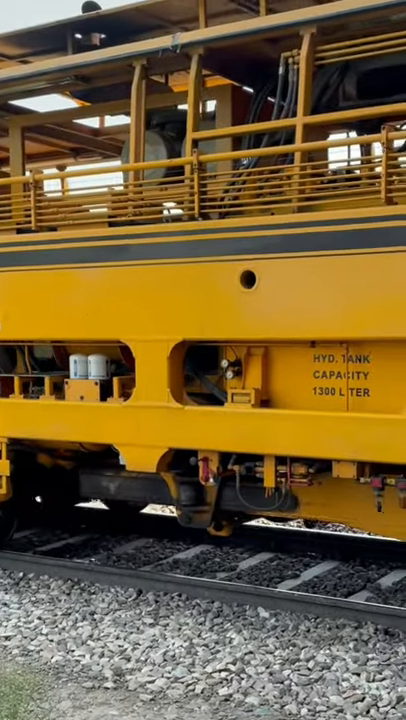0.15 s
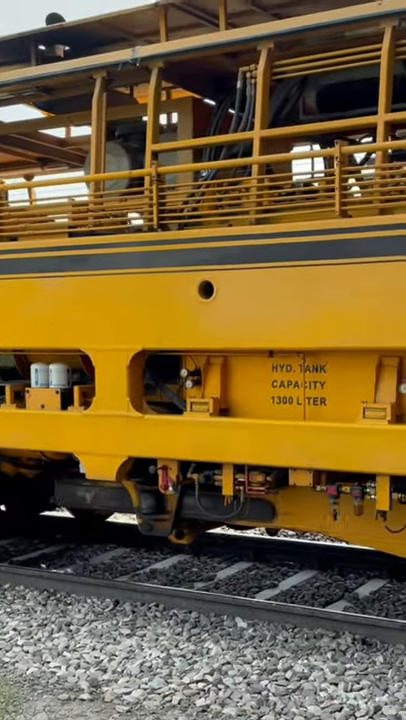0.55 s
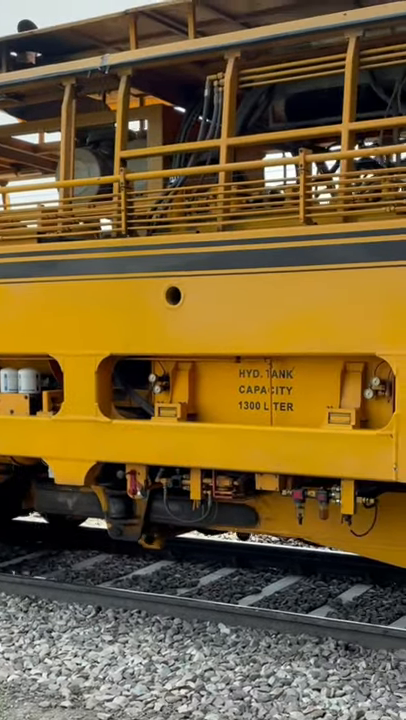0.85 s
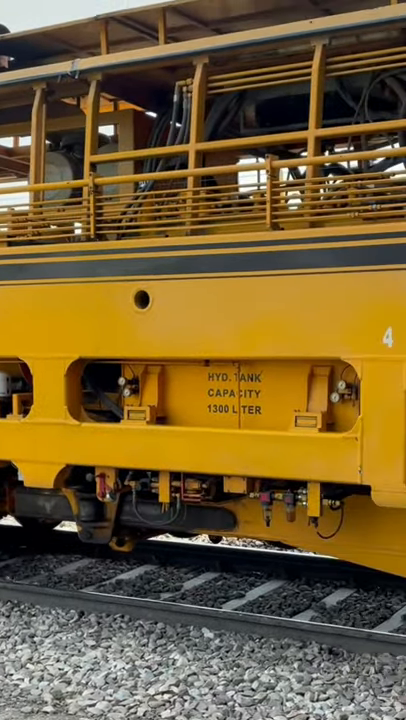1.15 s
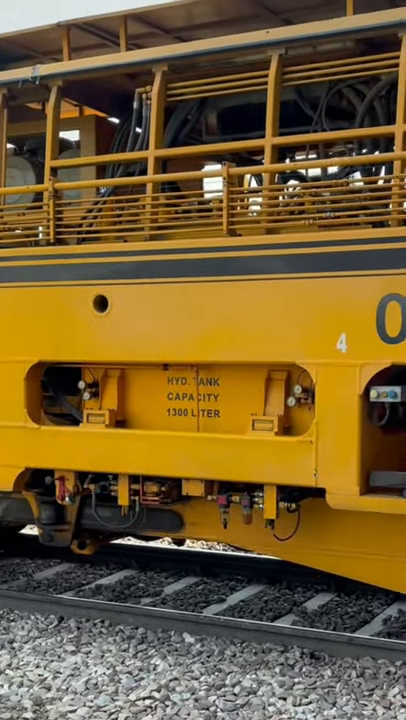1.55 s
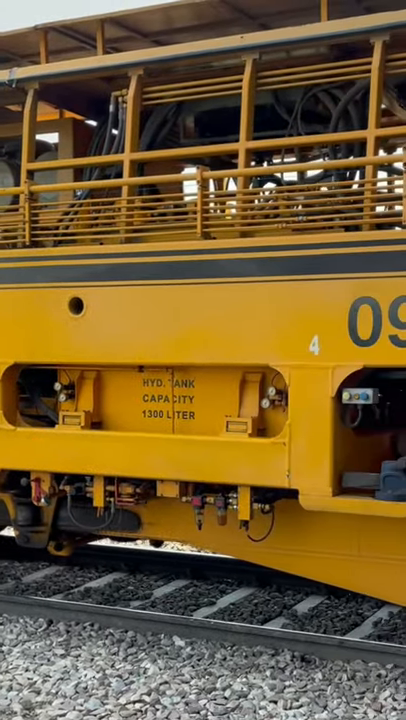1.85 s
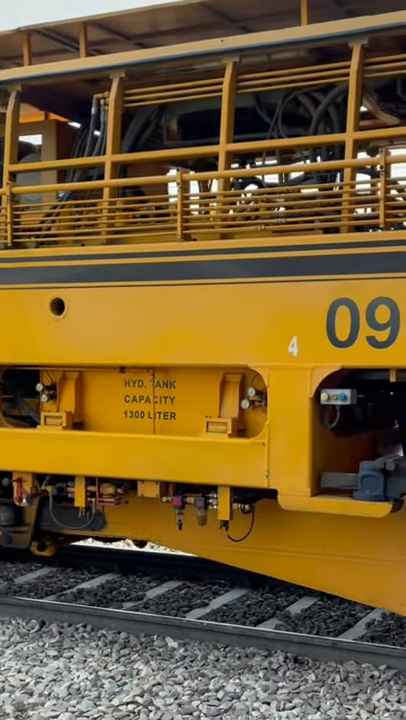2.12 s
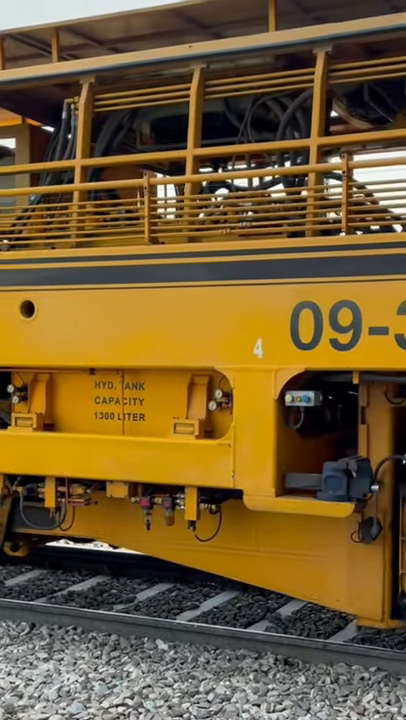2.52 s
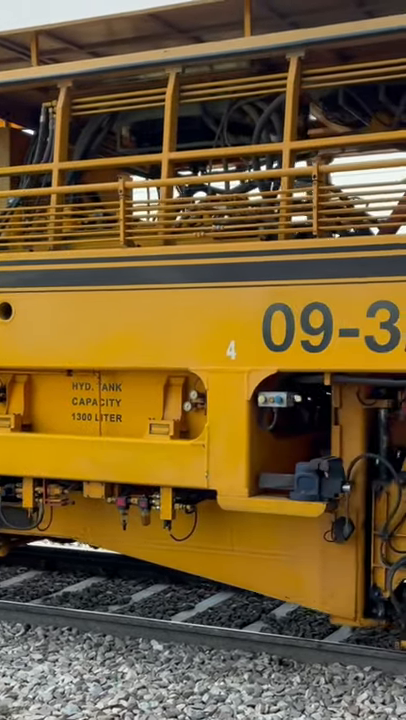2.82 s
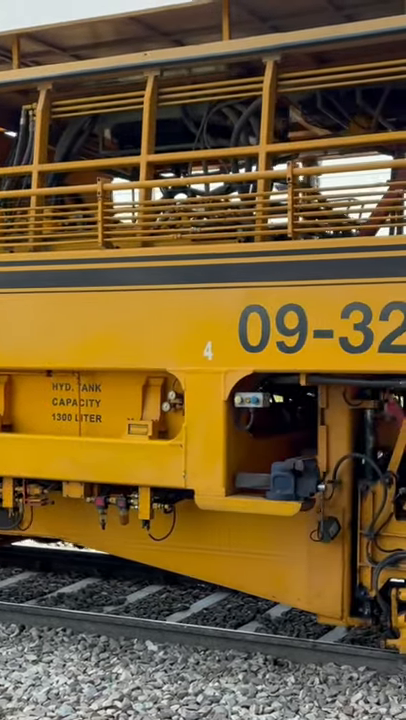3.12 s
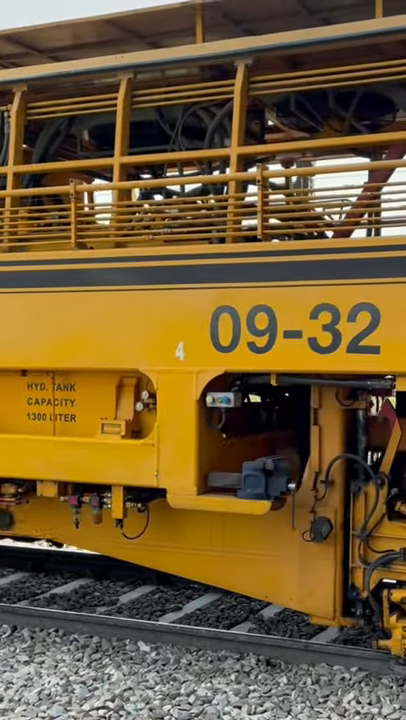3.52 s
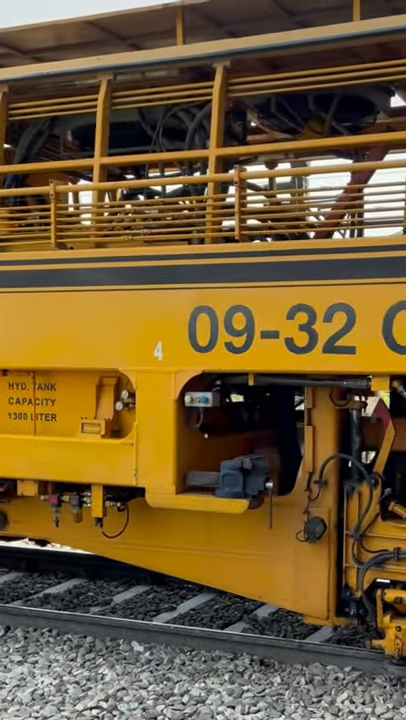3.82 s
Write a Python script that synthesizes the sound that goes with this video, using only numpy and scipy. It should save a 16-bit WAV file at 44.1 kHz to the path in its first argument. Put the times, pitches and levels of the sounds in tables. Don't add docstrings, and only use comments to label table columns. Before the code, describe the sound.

Continuous heavy diesel drone and machinery roar from a slow rail vehicle on ballast; the low drone swells early then eases, with thin whistle, air hiss and one tiny tick midway, close stereo microphone outdoors.

```python
import sys
import numpy as np
from scipy import signal
from scipy.fft import rfft, irfft
from scipy.io import wavfile

SR = 44100
rng = np.random.default_rng(int(sys.argv[2]) if len(sys.argv) > 2 else 0)


def ratio(d):
    e = np.asarray(d, float) / 20
    return 10 ** e


def inscribe(sig):
    pcm = np.round(np.clip(np.atleast_2d(sig).T, -1, 1) * 32767)
    wavfile.write(sys.argv[1], SR, pcm.astype(np.int16))


N = 175077
T_S, FREQ_HZ = np.arange(N) / SR, np.fft.rfftfreq(N, 1 / SR)

# pitch_hz, density_db_per_hz, port_likeness_0_to_1, left_lead_rad, left_minus_right_db
EXHAUST_SPECTRUM = [(30.0, -74.0, 1.0, -0.0, -0.0), (60.0, -55.8, 1.0, 0.0, -0.0),
                    (95.0, -53.9, 0.99, -0.0, 0.3), (145.0, -53.1, 0.99, -0.03, 0.5),
                    (200.0, -46.3, 1.0, -0.08, 1.2), (300.0, -45.4, 0.99, -0.14, 1.3),
                    (420.0, -46.3, 0.98, -0.34, 1.6), (520.0, -50.6, 0.9, -0.39, -0.4)]
CASING_SPECTRUM = [(520, -50.8, .9, -.39, -.4), (750, -52.3, .96, -.06, .4), (1150, -55.4, .95, -.03, -2.2),
                   (1500, -56.6, 1, 0, 0), (2030, -58.3, 1, 0, 0), (2450, -58.6, .83, .44, -2.7),
                   (2800, -61.5, .78, .65, -2.1), (3400, -66, .52, .59, -1.1)]
FAN_SPECTRUM = [(3400, -66, .52, .59, -1.1), (3800, -65.3, .6, .2, 2.2), (4200, -69.3, .72, .55, .1),
                (4650, -69.5, .45, .8, -.5), (4920, -72.5, 0, .3, -1), (5400, -69.3, .86, .2, 0),
                (6500, -71, .82, .94, 0), (8000, -72.3, .82, 2.1, 0)]
HISS_SPECTRUM = [(8000, -72.6, .82, 2.1, 0), (8750, -72.6, .88, 2.75, 0), (9430, -69, 1, np.pi, 0),
                 (11300, -76.8, 1, np.pi, 0), (11950, -78.4, .7, 3.85, 0), (13600, -81.3, .7, 5.5, 0),
                 (14000, -82.3, 1, 2 * np.pi, 0), (15720, -92.5, 1, 2 * np.pi, 0)]


def in_time(rows):
    row_s, *columns = np.transpose(rows)
    return [np.interp(T_S, row_s, column) for column in columns]


def in_pitch(rows):
    row_hz, *columns = np.transpose(rows)
    return [np.interp(np.log(FREQ_HZ + 1), np.log(row_hz), column) for column in columns]


def drift(rate_hz):
    pole = np.exp(-80 * np.pi * rate_hz / SR)
    noise = rng.standard_normal(N // 40 + 2002)
    slow = signal.lfilter([1], [1, -2 * pole, pole ** 2], noise)[2000:]
    return np.interp(np.arange(N) / 40, np.arange(len(slow)), slow / slow.std())


def ports(rows):
    _, _, lead_rad, pan_db = in_pitch(rows)
    return np.exp([[.5j], [-.5j]] * lead_rad) * ratio([[.5], [-.5]] * pan_db)


def tones(base_hz, orders, rows, wander_rad):
    turn_rad = 2 * np.pi * np.cumsum(base_hz + 0 * T_S) / SR
    total = 0
    for order, (start_db, end_db, wobble_db) in zip(orders, rows):
        level_db = start_db + (end_db - start_db) * T_S / T_S[-1] + wobble_db * drift(3.56)
        phase_rad = order * turn_rad + wander_rad * order * drift(2.6) + rng.uniform(0, 2 * np.pi)
        total = total + np.sqrt(2) * ratio(level_db) * np.sin(phase_rad)
    return total


def roar(rows, patchy_db, rate_hz, count):
    density_db, alike, *_ = in_pitch(rows)
    alike = np.clip(alike, 0, 1)
    white = rfft(rng.standard_normal((3, N)))
    mixed = np.sqrt(alike) * white[0] + np.sqrt(1 - alike) * white[1:]
    pair = ratio(density_db) * np.sqrt(SR / 2) * ports(rows) * mixed
    centres_hz = np.geomspace(rows[0][0], rows[-1][0], count)
    inside = (FREQ_HZ >= centres_hz[0]) & (FREQ_HZ < centres_hz[-1])
    together = drift(rate_hz / 4)
    total = 0
    for one in np.eye(count):
        band = irfft(pair * inside * np.interp(FREQ_HZ, centres_hz, one), N)
        total = total + band * ratio(patchy_db * (0.36 * together + drift(rate_hz)))
    return total


def engine():
    # start_s, pitch_hz
    firing = [(0, 109.1), (1, 109.3), (1.9, 109.65), (2.5, 109.7), (3.2, 109.4), (3.97, 109.0)]
    engine_orders = [1, 5 / 3, 2, 8 / 3, 3, 13 / 3]
    # start_db, end_db, wobble_db
    engine_levels = [(-26, -22.6, .6), (-37, -37, 1.5), (-28, -28, 1.8), (-39, -39, 1.5), (-36, -31, 1.5),
                     (-38, -38, 1.5)]
    return tones(in_time(firing)[0], engine_orders, engine_levels, wander_rad=.15)


def exhaust_drone():
    # start_s, level_db
    drone_levels = [(0, -26.5), (.3, -22.3), (.65, -20), (1, -21.5), (1.8, -21.5), (2.2, -25), (2.65, -26),
                    (2.9, -29), (3.97, -28.5)]
    return ratio(in_time(drone_levels)[0]) * tones(363.95, [1], [(0, 0, 1)], wander_rad=.3)


def second_shaft():
    shaft_orders = [.75, 1, 2, 10 / 3, 4, 6, 8, 10]
    # start_db, end_db, wobble_db
    shaft_levels = [(-45, -45, 2.1), (-30, -34, .7), (-33, -33.5, 1.2), (-29, -36, 2), (-36, -27.5, 2),
                    (-42, -42, 2), (-42, -42, 2), (-44, -44, 2)]
    return tones(83.35, shaft_orders, shaft_levels, wander_rad=.22)


PUMP_SPEED_HZ = 91.75


def pump():
    pump_orders = [3, 3.308, 6, 10]
    # start_db, end_db, wobble_db
    pump_levels = [(-24, -44.5, 3.5), (-37, -35, 1), (-38.5, -36, 2.5), (-46, -40, 3)]
    return tones(PUMP_SPEED_HZ, pump_orders, pump_levels, wander_rad=.2)


def gear_whines():
    # pitch_hz, width_hz, level_db
    whine_modes = [(1710, 45, -44), (2465, 22, -45), (2570, 15, -50), (1239, 12, -46), (578.4, 12, -39),
                   (415, 25, -37), (238.6, 19.5, -32)]
    total = 0
    for mode_hz, width_hz, level_db in whine_modes:
        pole = np.exp(-np.pi * width_hz / SR)
        resonance = [1, -2 * pole * np.cos(2 * np.pi * mode_hz / SR), pole ** 2]
        ring = rng.standard_normal(N)
        for _ in range(2):
            ring = signal.lfilter([1, 0, -1], resonance, ring)
        total = total + ratio(level_db) * ring / ring.std()
    return total


def turbo_whistle():
    # start_s, pitch_hz, level_db
    whistle_glide = [(0, 7620, -58), (.35, 7745, -49), (.8, 7850, -52), (1.05, 7730, -48.5),
                     (1.3, 7670, -51), (1.9, 7500, -53), (2.4, 7450, -52), (2.9, 7350, -60),
                     (3.55, 7600, -51), (3.97, 7760, -53)]
    pitch_hz, level_db = in_time(whistle_glide)
    return ratio(level_db) * tones(pitch_hz + 8 * drift(8), [1], [(0, 0, 2.5)], wander_rad=0)


def hum():
    mono = engine() + second_shaft() + pump() + gear_whines() + exhaust_drone() + turbo_whistle()
    return irfft(rfft(mono) * ports(EXHAUST_SPECTRUM + CASING_SPECTRUM + FAN_SPECTRUM + HISS_SPECTRUM), N)


def exhaust_roar():
    return roar(EXHAUST_SPECTRUM, patchy_db=0.18, rate_hz=2, count=6)


def casing_and_fan_roar():
    casing = roar(CASING_SPECTRUM, patchy_db=0.58, rate_hz=6, count=5)
    fan = roar(FAN_SPECTRUM, patchy_db=0.83, rate_hz=3.5, count=4)
    turn_rad = 2 * np.pi * PUMP_SPEED_HZ * T_S
    throb = 1 + .025 * (np.sin(turn_rad) + np.sin(2 * turn_rad))
    return throb * (casing + fan)


def air_puffs():
    # centre_s, half_length_s, level_over_fan_db
    puff_events = [
        (.22, 0.11, 1),
        (1.87, .07, -1.5),
        (2.1, 0.044, -3),
        (2.312, .05, -1),
        (2.827, 0.11, 1),
        (3.2, 0.069, -4),
        (3.45, 0.14, -1),
        (3.75, .05, -7),
    ]
    power = 0
    for centre_s, half_s, level_db in puff_events:
        power = power + ratio(2 * level_db) * np.exp(-((T_S - centre_s) / half_s) ** 4)
    band = signal.butter(2, [4540, 8200], "band", fs=SR, output="sos")
    turbulence = roar(FAN_SPECTRUM, patchy_db=1.2, rate_hz=19, count=3)
    return np.sqrt(power) * signal.sosfilt(band, turbulence)


def air_hiss():
    # start_s, level_db
    hiss_levels = [(0, .6), (1.6, .5), (2.1, -.3), (2.8, -.8), (3.35, -1.8), (3.97, .1)]
    return ratio(in_time(hiss_levels)[0]) * roar(HISS_SPECTRUM, patchy_db=1.2, rate_hz=12, count=4)


def tick():
    centre_s, half_s, level_db = 1.945, .008, -39
    band = signal.butter(4, [8800, 10100], "band", fs=SR, output="sos")
    noise = signal.sosfilt(band, rng.standard_normal(N))
    return ratio(level_db) * np.exp(-((T_S - centre_s) / half_s) ** 2) * noise * 3


def scene():
    return hum() + exhaust_roar() + casing_and_fan_roar() + air_puffs() + air_hiss() + tick()


def band_limit(x):
    return signal.sosfilt(signal.butter(12, 15710, fs=SR, output="sos"), x)


def record(dry):
    return band_limit(dry)


dry = scene()
out = record(dry)
inscribe(out)
```